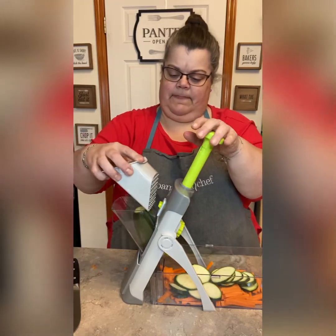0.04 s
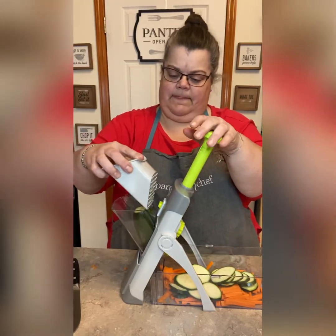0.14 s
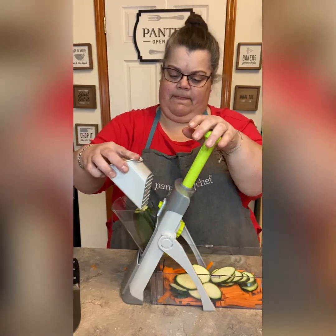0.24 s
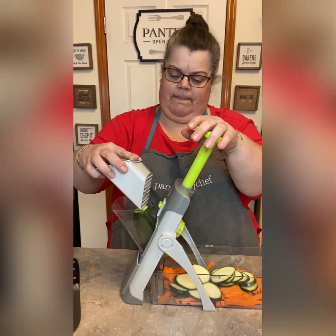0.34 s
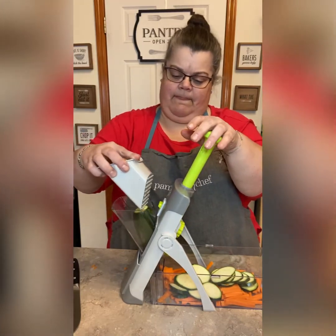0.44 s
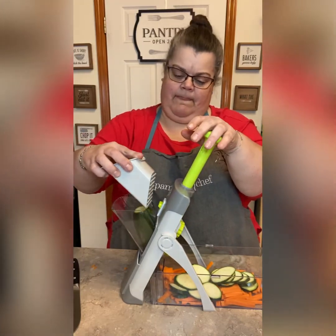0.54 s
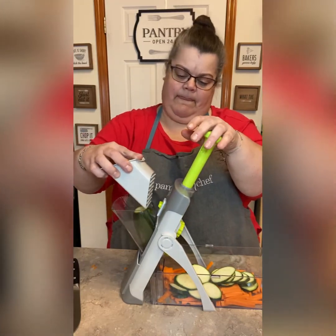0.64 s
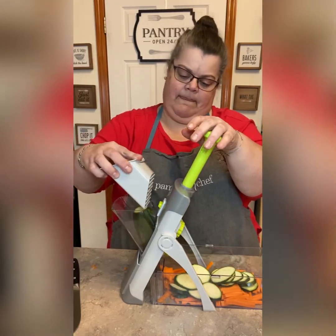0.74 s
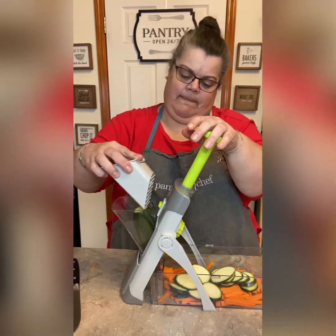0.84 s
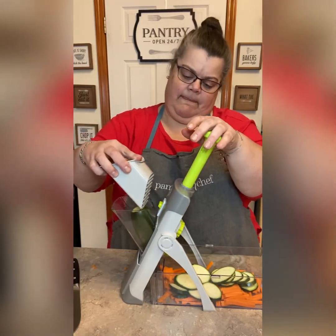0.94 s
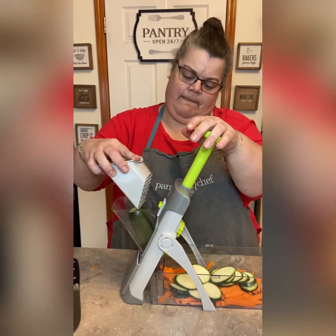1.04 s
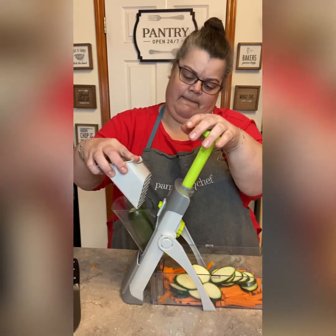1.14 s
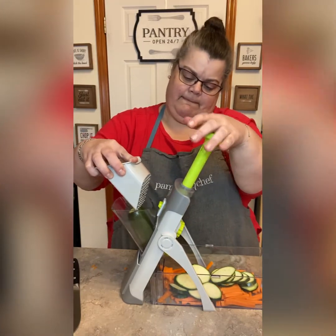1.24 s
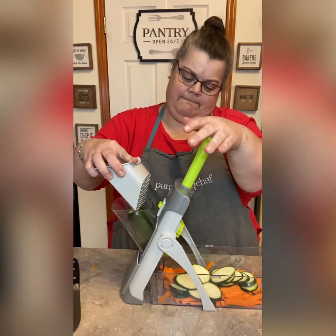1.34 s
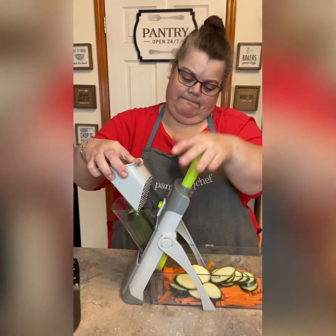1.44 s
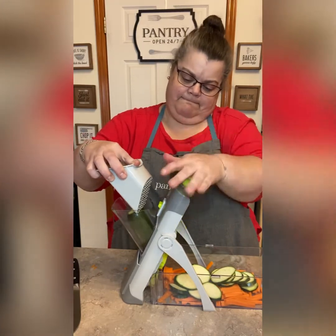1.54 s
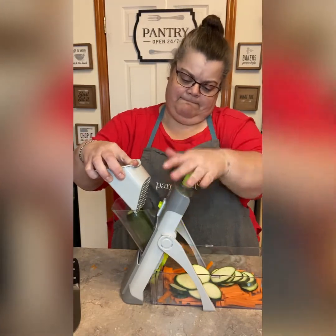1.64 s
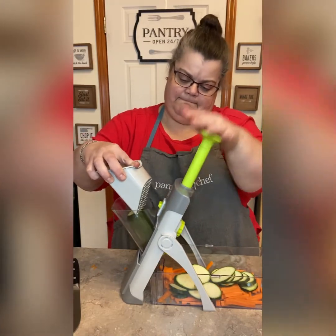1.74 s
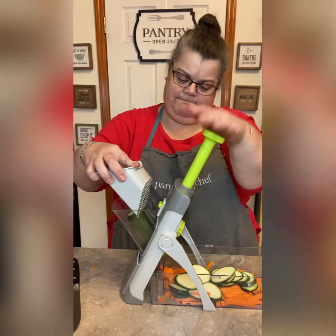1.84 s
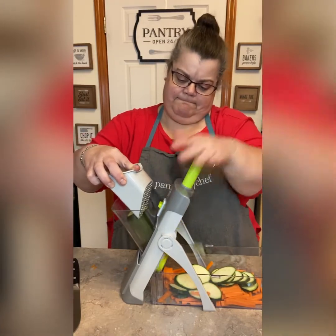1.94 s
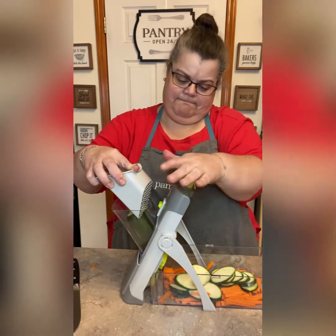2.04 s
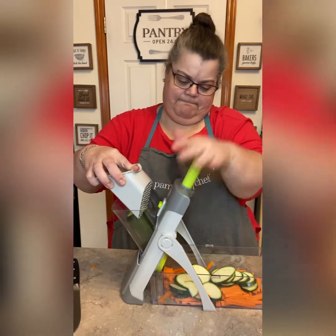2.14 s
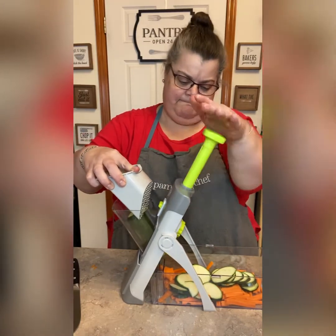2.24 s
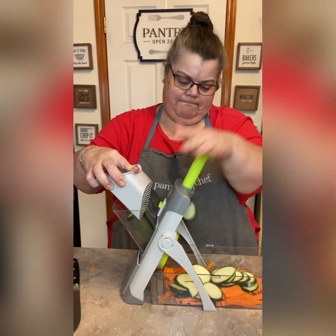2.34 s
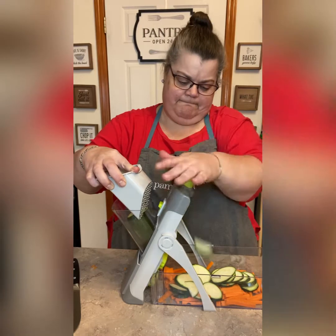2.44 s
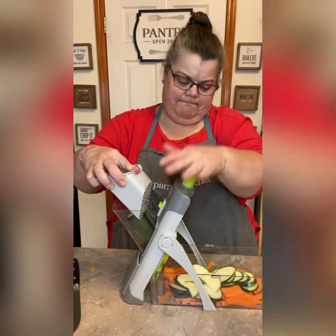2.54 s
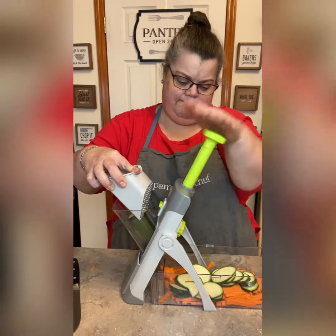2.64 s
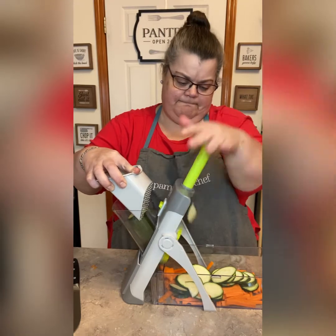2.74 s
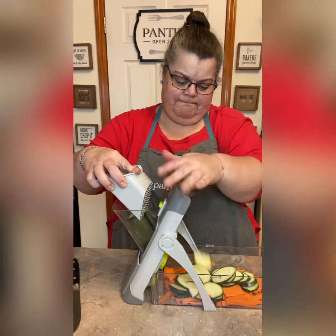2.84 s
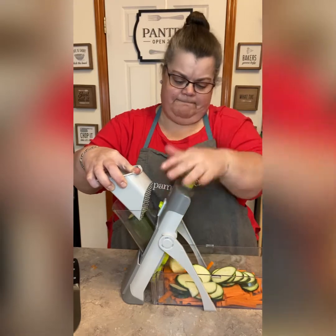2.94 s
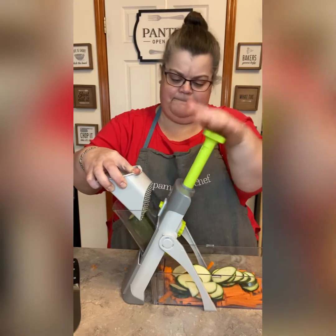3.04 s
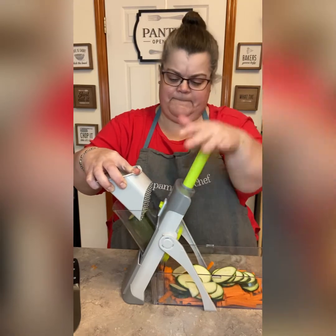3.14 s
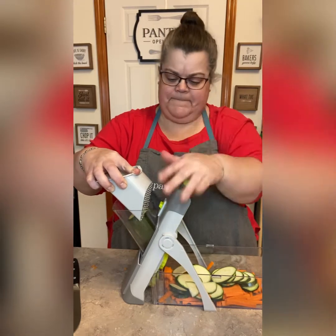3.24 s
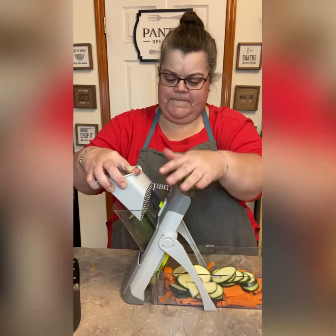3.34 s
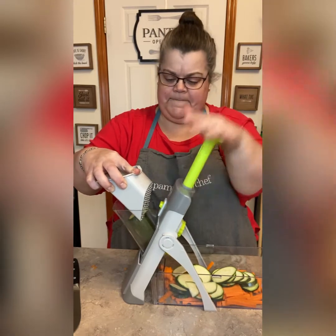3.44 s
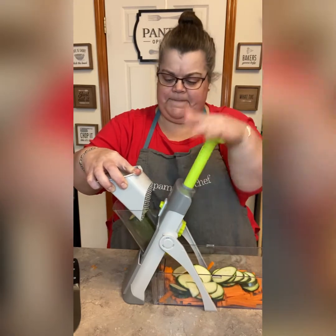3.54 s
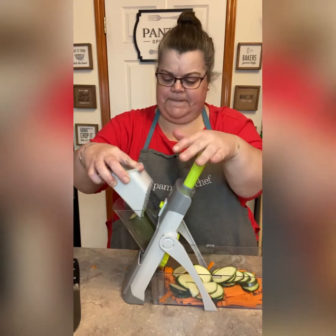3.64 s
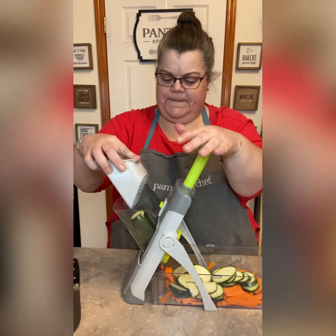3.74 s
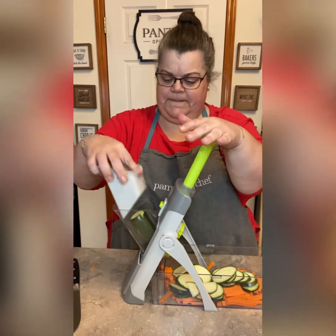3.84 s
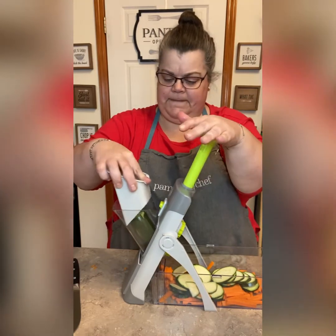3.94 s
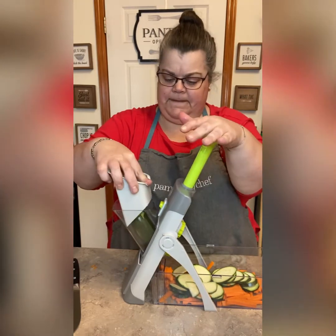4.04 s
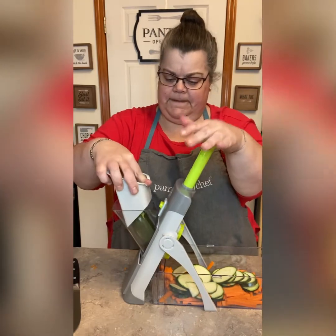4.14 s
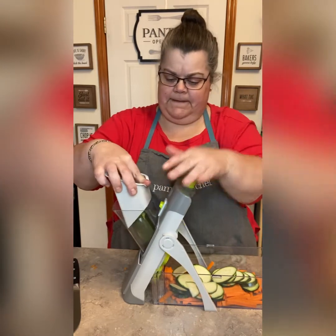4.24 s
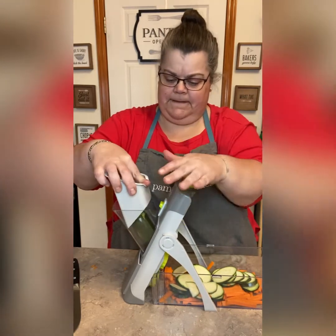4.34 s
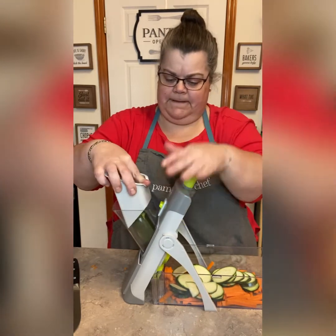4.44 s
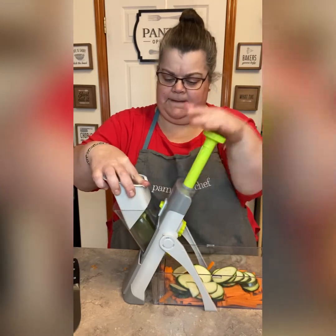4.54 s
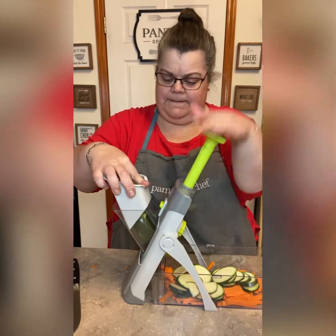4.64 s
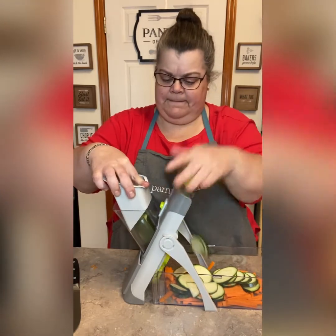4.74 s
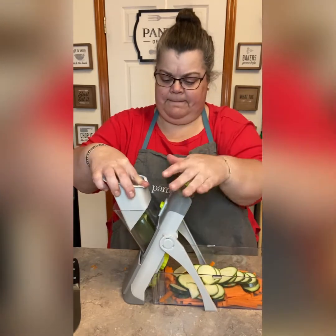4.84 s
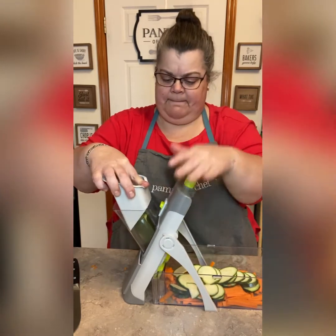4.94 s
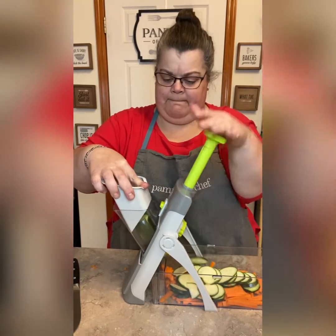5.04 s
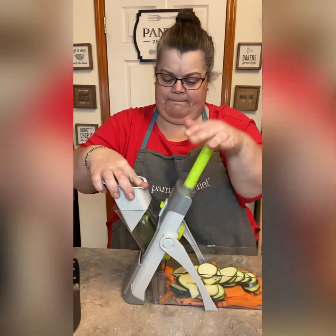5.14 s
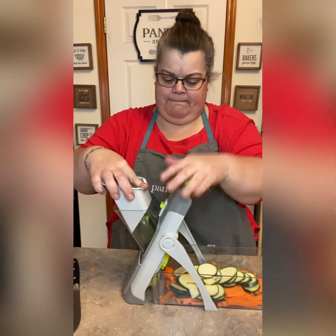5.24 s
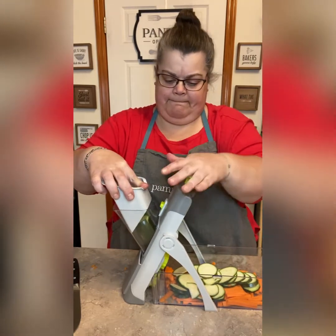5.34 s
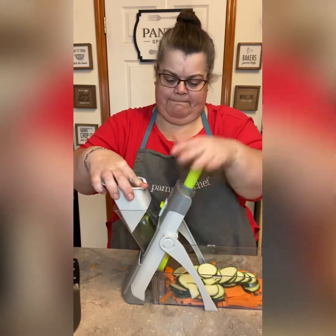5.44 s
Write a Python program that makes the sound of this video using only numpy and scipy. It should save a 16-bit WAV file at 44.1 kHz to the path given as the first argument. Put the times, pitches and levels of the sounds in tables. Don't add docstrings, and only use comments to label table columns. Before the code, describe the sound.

Faint plastic ticks and rubs open over soft bass-heavy room tone. Five pairs of hard, rattling slams and brighter spring-back clacks follow at roughly four or five stops a second. After a short gap with a sharp knock, three weaker slams follow, with snaps and small crunchy bites between them. Near, dry stereo phone pickup with slight short kitchen reverberation.

```python
import sys
import numpy as np
from scipy import signal
from scipy.fft import rfft, irfft
from scipy.io import wavfile
from scipy.ndimage import uniform_filter1d, minimum_filter1d

SR = 44100
rng = np.random.default_rng(int(sys.argv[2]) if len(sys.argv) > 2 else 0)


def output_pcm(signal):
    pcm = np.clip(np.atleast_2d(signal).T, -1, 1) * 32767
    wavfile.write(sys.argv[1], SR, np.round(pcm).astype(np.int16))


def natural_amplitude(level_db):
    exponent = np.asarray(level_db, float) / 20
    return 10 ** exponent


N = 242991

# start_s, strength_db, weight_on_counter_db, hardness_db
SLAM_STOPS = [
    (1.494, -15, 2, 2.5),
    (1.972, -13, 0.5, 3.5),
    (2.379, -12, -3.5, -4.5),
    (2.794, -16, 5, 7),
    (3.2, -10, 0, 0.5),
    (4.255, -19, 0.3, -2),
    (4.748, -18, 5.5, 3),
    (5.227, -18.5, 4, 2),
]
# pitch_hz, level_db, t60_s
FREE_FRAME = [(690, -34, 0.037), (778.3, 6, 0.07), (844, 3.5, 0.093), (1012, 4, 0.024), (1178, 1.5, 0.017)]
# pitch_hz, level_db, t60_s
RAIL_MODES = [(540, -16, 0.0076), (764, 6.5, 0.24), (938, 6.5, 0.027), (1200, 3, 0.021), (1630, -3.5, 0.04),
              (2000, -10, 0.025), (2480, -5.5, 0.039), (3050, -22, 0.074)]


def plunger():
    # start_s, strength_db, weight_on_counter_db, hardness_db
    snap_stops = [
        (1.726, -13, -15, -2.2),
        (2.177, -16, -12.5, 0.5),
        (2.608, -12.5, -16, -1.7),
        (3.011, -16, -14.5, 0.3),
        (3.428, -17, -8, 1.94),
        (4.512, -17.5, -3, -0.5),
        (4.707, -16, -8.5, -11.5),
        (5.013, -22, -2, -1.5),
    ]
    # start_s, strength_db, weight_on_counter_db, hardness_db
    bite_stops = [
        (4.474, -29.5, 3.5, 7),
        (4.974, -34.5, 8, 12),
        (5.187, -34, -5, 7),
        (5.444, -33.5, 7, 9.5),
    ]
    # pitch_hz, level_db, t60_s
    pinned_frame = [(670, -14.5, 0.0035), (726, -4, 0.21), (802, 0.5, 0.031), (1090, -1, 0.014),
                    (1327, -12, 0.046)]
    # pitch_hz, level_db, t60_s
    slam_clack = [(1566, -16.5, 0.06), (1570, 5.5, 0.018), (2196, 6, 0.015), (2372, -9, 0.075),
                  (3030, -3.5, 0.051)]
    # pitch_hz, level_db, t60_s
    snap_clack = [(1660, -5.5, 0.051), (2050, -7, 0.026), (2385, -1, 0.023), (2632, -8, 0.076),
                  (2920, -16.5, 0.067), (2866, -13.5, 0.09)]
    down = stops(SLAM_STOPS, pinned_frame, slam_clack, clack_db=-10.0, crack_db=-9.5, crack_per_hard=0.79,
                 frame_rise_s=0.0068, lead_db=-14.5, rattle_db=-15.0, legs_db=-3.5)
    up = stops(snap_stops, FREE_FRAME, snap_clack, clack_db=4.5, crack_db=0.91, crack_per_hard=1.2,
               frame_rise_s=0.00059, lead_db=-17.0, rattle_db=-15.0, legs_db=-3.5)
    bite = stops(bite_stops, RAIL_MODES[:4], slam_clack, clack_db=-10.5, crack_db=-9.0, crack_per_hard=0.63,
                 frame_rise_s=0.006, lead_db=-24.0, rattle_db=-7.5, legs_db=-6.5, lag_s=0.01264)
    return down + up + bite


def stops(table, low, high, clack_db, crack_db, crack_per_hard, frame_rise_s, lead_db, rattle_db, legs_db,
          lag_s=0):
    # pitch_hz, level_db, t60_s
    leg_modes = [(175, 1.5, 0.057), (242, 1, 0.015), (316.5, 0.5, 0.063), (382, -7, 0.058),
                 (450, -10, 0.0078)]
    # pitch_hz, density_db_per_hz
    crack_spectrum = [(1470, -6), (2500, -1), (3860, -7.5), (4340, -2.5), (6760, -9), (7610, -9.5),
                      (12100, -17.5), (16000, -38.5), (16500, -56.5)]
    s, frame_db, weight_db, hard_db = np.transpose(table)
    thump_db = frame_db + weight_db
    clack_db = frame_db + clack_db + hard_db
    crack_db = frame_db + crack_db + crack_per_hard * hard_db
    chatter = unit(grit(2.47))
    rattle = unit(grit(4.4) * crunch()) * natural_amplitude(3.3 * walk(110))

    slab = strike(s + lag_s + 0.0008, thump_db + 7.5, thump())
    legs = ring(chatter * bursts(s + lag_s + 0.0025, thump_db + legs_db, 0.00081, 0.0076), leg_modes)

    frame = ring(chatter * bursts(s, frame_db - 3.0, frame_rise_s, 0.0026), low)
    frame = frame + ring(rattle * bursts(s, frame_db + rattle_db, 0.0023, 0.017), low, held=0.44)

    run_up = bursts(s - .009, clack_db + lead_db, .004, 0.0055)
    landing = bursts(s - .001, clack_db - 4.5, 0.00035, 0.0037)
    clack = ring(grit(6.0) * (landing + run_up), high)
    clack = clack + ring(rattle * bursts(s, clack_db + rattle_db, 0.0028, 0.038), high, held=0.27)

    crack = bursts(s - .001, crack_db + 6.5, 0.0032, 0.0031)
    crack = crack + bursts(s, crack_db - 38.0, 0.0022, 0.06)
    return slab + legs + frame + clack + colour(grit(5.5), crack_spectrum) * crack


def thump():
    end_hz, start_hz, glide_s, hold_s = 100.6, 436, 0.0032, 0.026
    t = np.arange(int(.2 * SR)) / SR
    turns = end_hz * t + (start_hz - end_hz) * glide_s * (1 - np.exp(-t / glide_s))
    swing = np.exp(-(t / hold_s) ** 2.5) + .07 * np.exp(-t / .04)
    return (1 - np.exp(-t / 0.012)) * swing * -np.sin(2 * np.pi * (turns + 0.1))


def rubbing():
    # pitch_hz, level_db, t60_s
    counter_modes = [(107, 12.5, 0.036), (67, -0.5, 0.18), (162, -4.5, 0.036), (235, -10, 0.063),
                     (340, -4, 0.18)]
    # pitch_hz, density_db_per_hz
    hiss_spectrum = [(1470, -5), (2500, -1.5), (2750, -0.5), (3140, -7.5), (10400, -21.5), (14800, -45),
                     (16500, -54.5)]
    rumble_db, sway_db, sway_s = 2.5, -12.5, 0.048
    pressure, scrape = rub_envelopes()
    s, db, weight_db, _ = np.transpose(SLAM_STOPS)
    t = np.arange(int(.4 * SR)) / SR
    sway = strike(s, db + weight_db + sway_db, (1 - np.exp(-t / 0.06)) * np.exp(-t / sway_s))

    catch_db = 2.5 * walk(90)
    snaps = crunch()
    drag = grit(4.5) * natural_amplitude(catch_db) * snaps
    frame = 0
    for mode in RAIL_MODES:
        frame = frame + ring(drag * natural_amplitude(4.5 * walk(35)), [mode], held=0.45)

    hiss = colour(grit(2.5) * snaps, hiss_spectrum) * scrape * natural_amplitude(.7 * catch_db + 3 * walk(25))
    rumble = np.minimum(pressure * natural_amplitude(rumble_db), natural_amplitude(-21.5)) + sway
    return unit(frame) * pressure + hiss + unit(ring(grit(2.2), counter_modes)) * rumble


def rub_envelopes():
    # start_s, hold_s, level_db,
    # hiss_offset_db
    scuffs = [(0.0, 0.027, -56, -18), (0.121, 0.021, -45.5, -16), (0.218, 0.028, -53.5, -36),
              (0.336, 0.022, -80, -30), (0.417, 0.025, -59, -32), (0.521, 0.038, -48.5, -35),
              (0.617, 0.075, -45, -25), (0.827, 0.14, -52.5, -36), (1.103, 0.012, -57, -22),
              (1.237, 0.081, -62, -10), (3.502, .12, -45, -2), (3.783, 0.02, -55, 1),
              (3.843, 0.053, -44.5, -11), (4.716, .025, -29, -26), (3.646, 0.11, -55.5, -10)]
    # start_s, hold_s, level_db, hiss_offset_db
    travels = [(1.323, 0.19, -46.5, 2), (1.587, 0.12, -39, -7), (1.768, 0.14, -42, -11),
               (1.855, 0.092, -33, -9), (2.023, 0.14, -39.5, -5), (2.192, 0.42, -48.5, 6.5),
               (2.435, 0.32, -50.5, -36), (2.655, 0.24, -47, 7), (2.894, 0.1, -39, -1.5),
               (3.052, .14, -45.5, 4.5), (3.28, .14, -45, -1.5), (4.096, 0.07, -61.5, 8),
               (4.136, 0.106, -46.5, 1), (4.363, 0.098, -38, -8.5), (4.543, 0.16, -43, -6.5),
               (4.856, 0.097, -37, -11.5), (5.025, 0.15, -43, -4), (5.273, 0.12, -53, -8),
               (5.369, 0.17, -43, -1.5)]
    t = np.arange(N) / SR
    start, hold, db, hiss_db = np.transpose(scuffs + travels)[:, :, None]
    hand = np.arange(len(start))[:, None] < len(scuffs)
    attack_s = np.where(hand, 0.0074, 0.035)
    release_s = np.where(hand, 0.034, 0.0073)
    swell = np.clip((t - start) / attack_s, 0, 1) ** 2
    shape = swell * np.exp(-np.maximum(t - start - hold, 0) / release_s)
    return np.sum(shape * natural_amplitude(db), axis=0), np.sum(shape * natural_amplitude(db + hiss_db), axis=0)


def crunch():
    snaps_per_s, level_db = 130, -4.5
    snaps = (rng.random(N) < snaps_per_s / SR) * natural_amplitude(3.0 * rng.standard_normal(N))
    t = np.arange(int(.02 * SR)) / SR
    return 1 + natural_amplitude(level_db) * signal.fftconvolve(snaps, np.exp(-t / 0.0014))[:N]


def ticks():
    # start_s, peak_db,
    # pitch_hz, click_db
    nudges = [(0.143, -30, 900, -40), (0.208, -42, 740, -67), (0.311, -39, 605, -74),
              (0.428, -48, 730, -75), (0.529, -31, 700, -48), (0.531, -35, 425, -70),
              (0.639, -35.5, 720, -47), (0.685, -36.5, 650, -35), (0.838, -38.5, 694, -53),
              (0.858, -34, 740, -43), (1.031, -44.5, 1120, -59), (1.11, -44, 1120, -53),
              (1.24, -70, 850, -50), (1.255, -59, 830, -53), (3.535, -31.5, 708, -39.5),
              (3.646, -32.5, 1350, -57), (3.783, -34, 1470, -24.5), (3.84, -15.5, 713, -20.5),
              (4.722, -16, 820, -32.5), (4.733, -14, 850, -39)]
    # start_s, peak_db, pitch_hz, click_db
    stroke_ticks = [(1.416, -42, 720, -44), (1.448, -25, 3010, -42.5), (1.609, -24, 515, -50),
                    (1.663, -22.5, 2000, -30), (1.842, -48, 2120, -18), (1.87, -39, 616, -40),
                    (1.894, -20, 1200, -20.5), (2.07, -25, 316, -54.5), (2.138, -29, 3020, -42),
                    (2.277, -48, 730, -17), (2.349, -30, 1240, -18.5), (2.489, -32, 640, -58),
                    (2.572, -32, 3050, -46), (2.765, -48, 794, -21), (2.903, -27.5, 714, -49),
                    (2.976, -31.5, 810, -29), (3.111, -28.5, 1020, -38.5), (3.17, -51, 735, -25),
                    (3.318, -27.5, 676, -30), (3.359, -33, 1110, -54), (4.171, -41, 844, -40),
                    (4.211, -35, 785, -33), (4.392, -28, 700, -31), (4.635, -41, 1120, -12),
                    (4.678, -50, 820, -36), (4.889, -33, 620, -52), (4.922, -29, 483, -38),
                    (5.098, -39, 2400, -21), (5.108, -30, 1120, -34), (5.363, -32.5, 510, -36.5)]
    blade_hz, plastic_hz, click_spread = 5300, 4000, .1
    out = np.zeros(N + SR)
    t = np.arange(int(.12 * SR)) / SR
    touch = (1 - np.exp(-t / .0004)) * np.exp(-t / .003)
    settle = .05 * (1 - np.exp(-t / .005)) * np.exp(-t / .03)
    knocks = nudges + stroke_ticks
    for (s, db, hz, click_db), x in zip(knocks, rng.standard_normal((len(knocks), len(t)))):
        click_hz = (blade_hz if click_db > db + 12 else plastic_hz) * np.exp(click_spread * x[0])
        body = ring(x * touch, [(hz, 0, 17 / hz), (1.7 * hz, -5.0, 8 / hz), (2.9 * hz, -4.0, 16 / hz)])
        body = ring(body, [(1.334 * hz, 0, 2.5 / hz)])
        body = signal.lfilter(*signal.butter(3, 0.78 * hz, "high", fs=SR), body)
        loose = ring(np.gradient(x * settle) * 2.2, FREE_FRAME + RAIL_MODES[4:], held=0.85)
        body = body / np.abs(body).max() + loose
        click = ring(x * touch, [(click_hz, 0, .003), (4500, -7.0, .0025), (6500, -5.0, .002),
                                 (9000, -7.0, .002), (12500, -17.0, .002)])
        at = slice(int(s * SR), int(s * SR) + len(t))
        out[at] += natural_amplitude(db + 3.5) * body + natural_amplitude(click_db - 4.0) * click / np.abs(click).max()
    return out[:N]


def kitchen(x):
    # centre_hz, t60_s, level_db
    room_bands = [(140, 0.35, -23), (320, 0.3, -13.5), (1040, 0.36, -20), (2060, 0.31, -11.5),
                  (5000, 0.34, -14.5), (9900, 0.23, -12)]
    t = np.arange(int(.7 * SR)) / SR
    tail = 0
    for hz, t60, db in room_bands:
        sos = signal.butter(2, [hz / 2.1, min(hz * 1.29, SR * .45)], "band", fs=SR, output="sos")
        band = signal.sosfilt(sos, rng.standard_normal((2, len(t))))
        fade = (1 - np.exp(-t / 0.004)) * np.exp(-np.log(1000) * t / t60)
        tail = tail + natural_amplitude(db) * band * fade / np.sqrt(np.sum(fade ** 2))
    return signal.fftconvolve(tail, x[None], axes=1)[:, :N]


def fridge_air():
    # pitch_hz, density_db_per_hz
    air_spectrum = [(15, -28.5), (25, 0), (65, 8), (172, 4), (382, -13.5), (477, -16.5), (727, -12),
                    (991, -23.5), (1110, -28), (1510, -33), (2810, -41.5), (5000, -51), (6500, -74),
                    (11000, -120)]
    return colour(rng.standard_normal((2, N)), air_spectrum) * natural_amplitude(-53.5 + 0.74 * walk(1.1))


def diffuse(near, mid, side):
    side = signal.lfilter(*signal.butter(2, [450., 6000.], "band", fs=SR), side)
    return ports(near + mid) + np.array([side, -side])


def ports(x):
    # pitch_hz, left_lead_radians
    port_lead = [(0, 0), (900, -.4), (1600, 0), (2300, -.9), (3100, -1.2), (3600, -.2), (7000, -.3),
                 (10000, -1.5), (12000, -2.4), (14000, -2.6)]
    # pitch_hz, left_minus_right_db
    port_left = [(60, 0), (200, 1), (380, 2.5), (700, 4.5), (1300, 1.5), (2400, .7), (4400, 0)]
    # pitch_hz, level_db
    port_lift = [(8000, -1.5), (11000, -0.5), (13000, 6), (16000, -16)]
    hz = np.fft.rfftfreq(N, 1 / SR)
    half = natural_amplitude(read(port_left, hz) / 2) * np.exp(.5j * np.interp(hz, *np.transpose(port_lead)))
    return irfft(rfft(x) * natural_amplitude(read(port_lift, hz)) * np.array([half, 1 / half]), N)


def strike(times, db, shape):
    marks = np.zeros(N)
    np.add.at(marks, np.clip((times * SR).astype(int), 0, N - 1), natural_amplitude(db))
    return signal.fftconvolve(marks, shape / np.abs(shape).max())[:N]


def bursts(times, db, rise_s, fall_s):
    t = np.arange(int(.15 * SR)) / SR
    return strike(times, db, (1 - np.exp(-t / rise_s)) * np.exp(-t / fall_s))


def ring(x, modes, held=0.8):
    out = 0
    for hz, db, t60 in modes:
        r = np.exp(-np.log(1000) / (max(held * t60, .002) * SR))
        w = 2 * np.pi * hz / SR
        mode = signal.lfilter([np.sin(w)], [1, -2 * r * np.cos(w), r * r], x)
        out = out + natural_amplitude(db) * 2 * np.sqrt(1 - r) * mode
    return out


def grit(spread_db):
    impact_db = min(spread_db, 4) * np.minimum(rng.exponential(size=N), 3)
    return unit(rng.standard_normal(N) * natural_amplitude(impact_db))


def walk(rate_hz):
    k = int(SR / rate_hz)
    steps = np.repeat(rng.standard_normal(N // k + 1), k)
    return unit(uniform_filter1d(uniform_filter1d(steps, k), k)[:N])


def colour(x, table):
    hz = np.fft.rfftfreq(N, 1 / SR)
    return unit(irfft(rfft(x, N) * natural_amplitude(read(table, hz)), N))


def read(table, hz):
    f, v = np.transpose(table)
    return np.interp(np.log(hz + 1), np.log(f + 1), v)


def unit(x):
    return x / np.sqrt(np.mean(x ** 2, axis=-1, keepdims=True))


def scene():
    slicer = plunger() + ticks() + rubbing()
    no_bass = signal.butter(2, 60., "high", fs=SR, output="sos")
    slicer = signal.sosfilt(no_bass, slicer)
    mid, side = kitchen(slicer) + fridge_air()
    return diffuse(slicer, mid, side)


def roll_off(x):
    return signal.sosfilt(signal.butter(12, 16650, fs=SR, output="sos"), x)


def record(dry):
    x = signal.sosfilt(signal.butter(2, 55., "high", fs=SR, output="sos"), dry)
    gain = np.minimum(1, natural_amplitude(0.5) / (np.abs(x).max(axis=0) + 1e-9)) ** 0.7
    hold = int(0.013 * SR)
    x = x * uniform_filter1d(minimum_filter1d(gain, size=hold), size=hold)
    mix = np.clip(x, -.95, .95)
    return roll_off(mix)


dry = scene()
out = record(dry)
output_pcm(out)
```